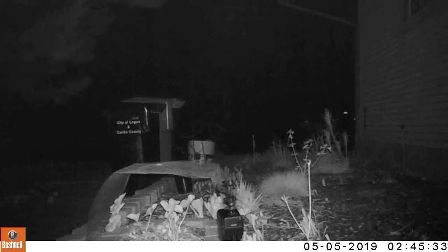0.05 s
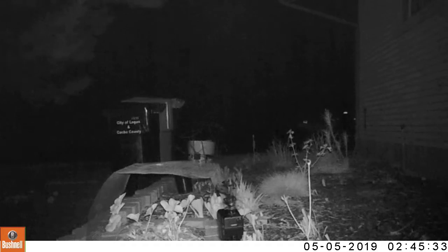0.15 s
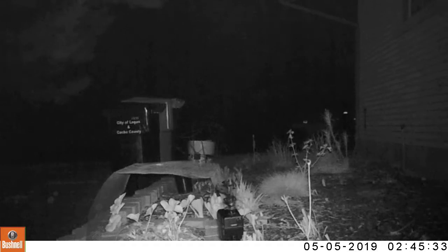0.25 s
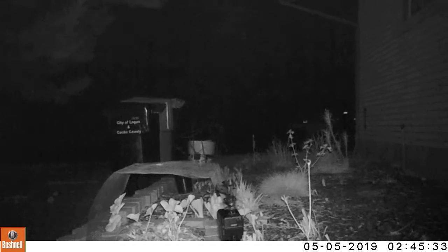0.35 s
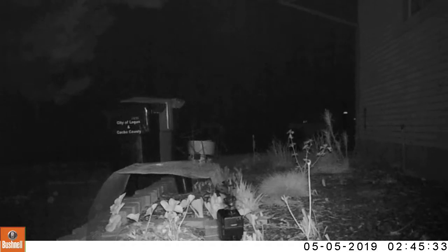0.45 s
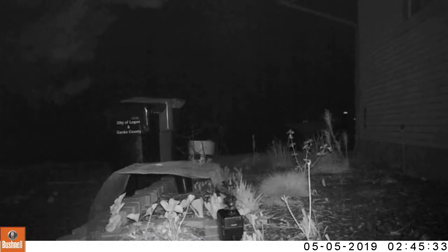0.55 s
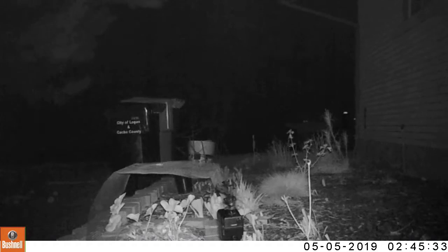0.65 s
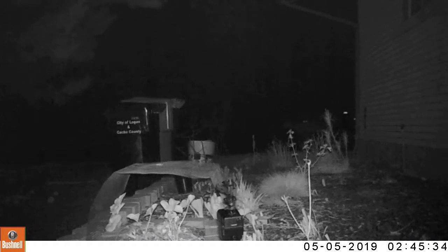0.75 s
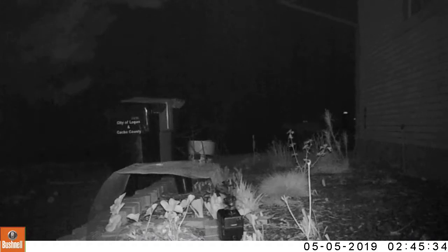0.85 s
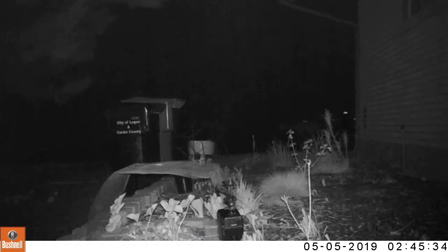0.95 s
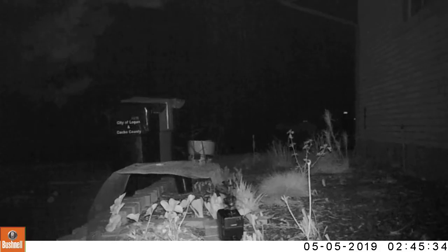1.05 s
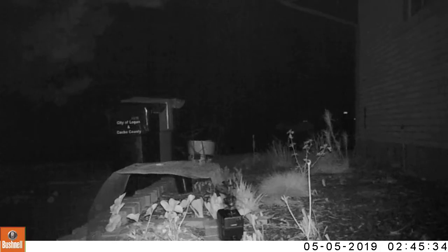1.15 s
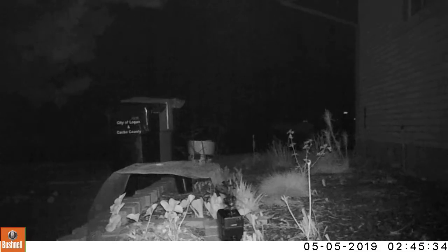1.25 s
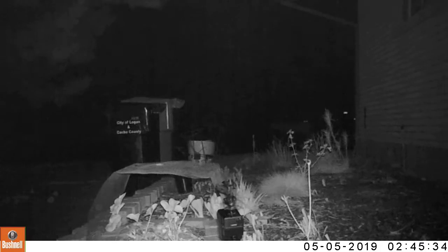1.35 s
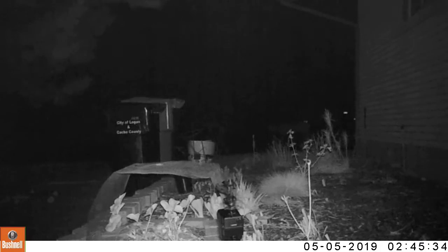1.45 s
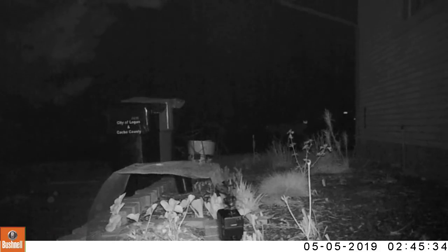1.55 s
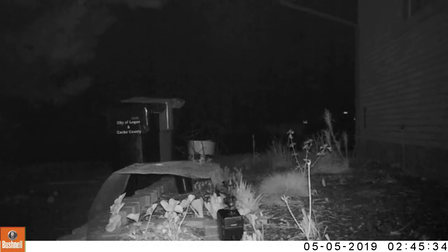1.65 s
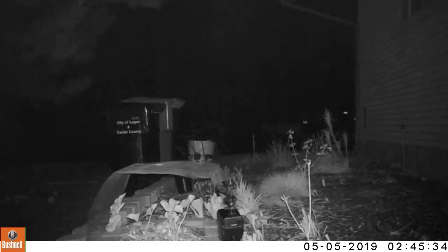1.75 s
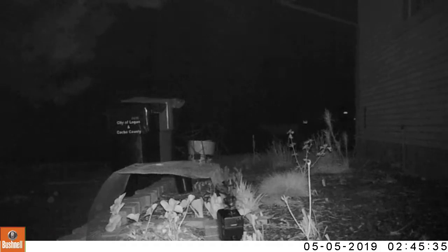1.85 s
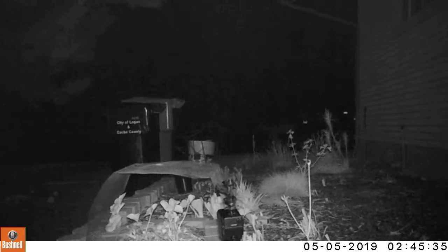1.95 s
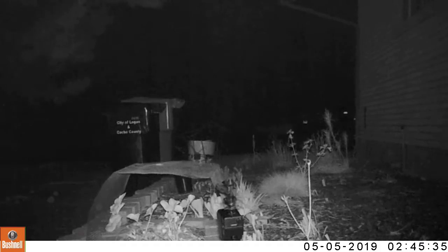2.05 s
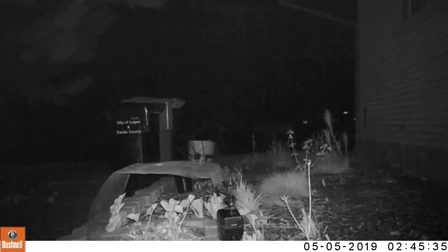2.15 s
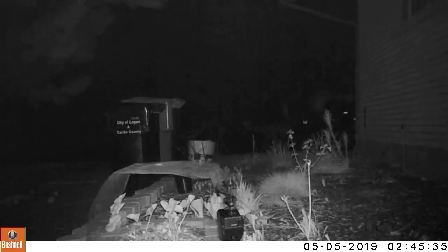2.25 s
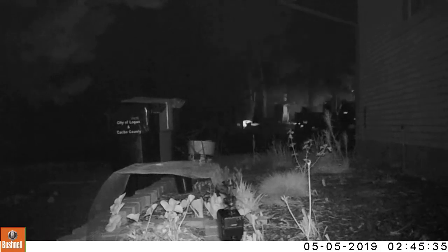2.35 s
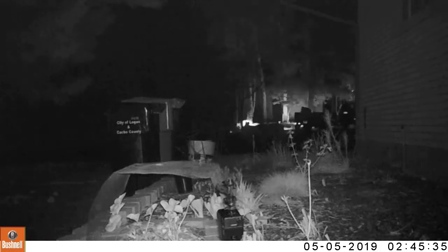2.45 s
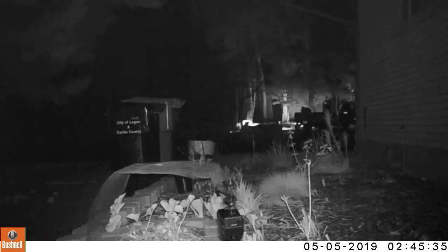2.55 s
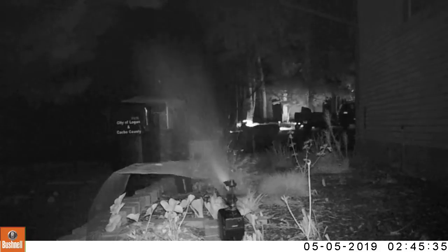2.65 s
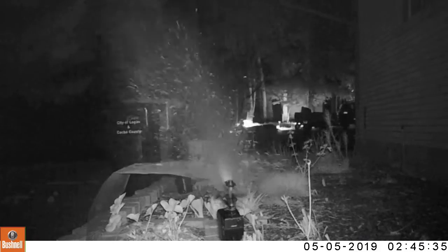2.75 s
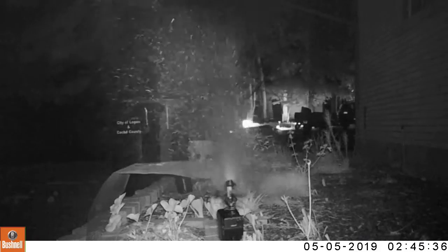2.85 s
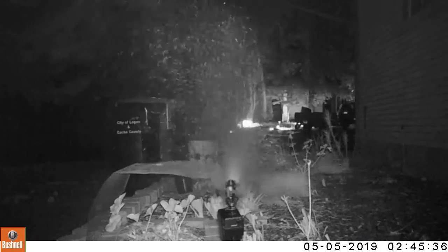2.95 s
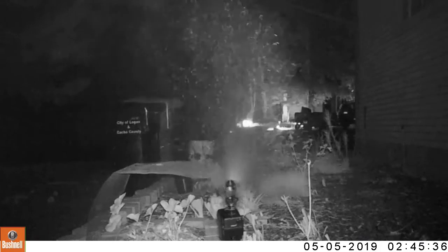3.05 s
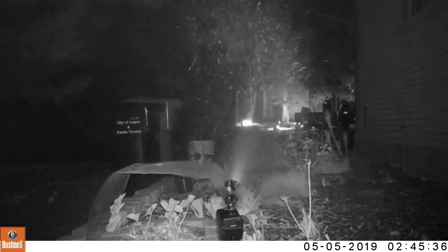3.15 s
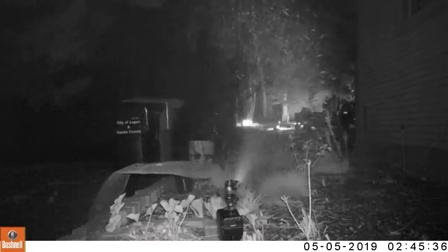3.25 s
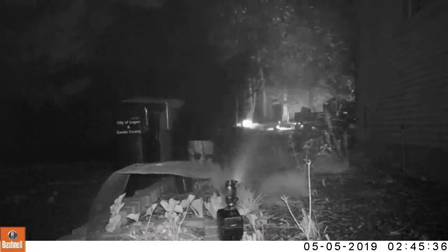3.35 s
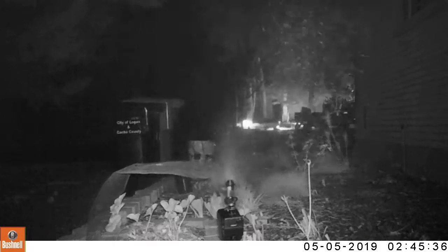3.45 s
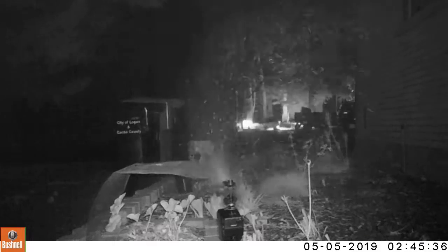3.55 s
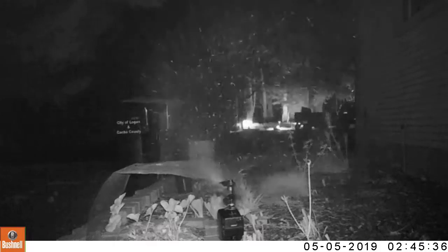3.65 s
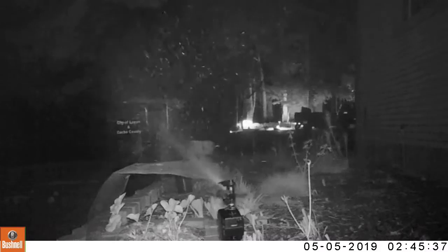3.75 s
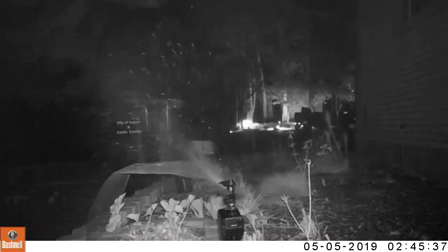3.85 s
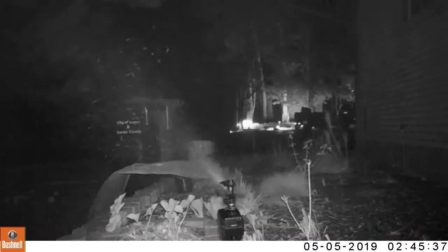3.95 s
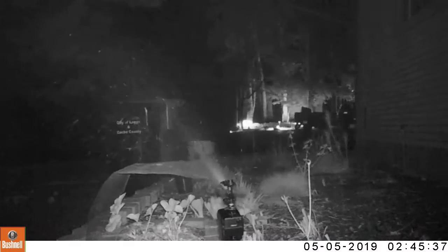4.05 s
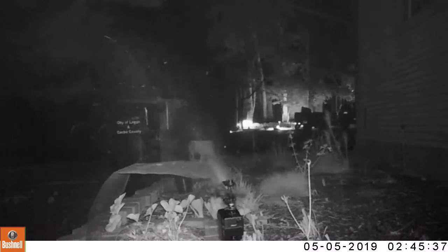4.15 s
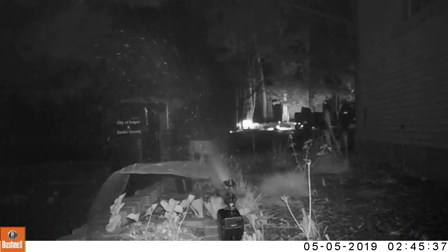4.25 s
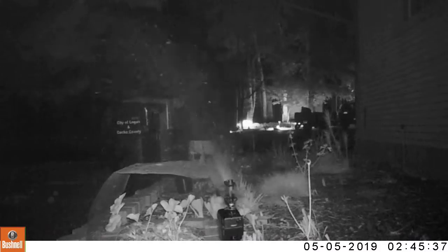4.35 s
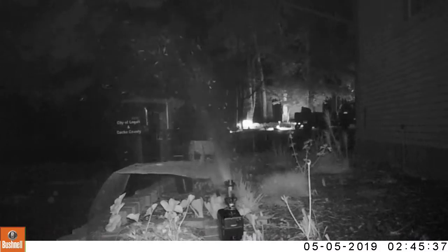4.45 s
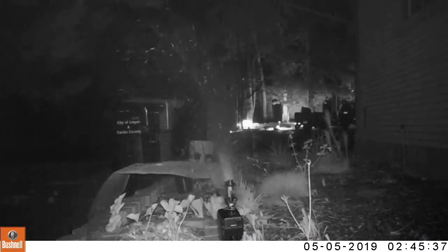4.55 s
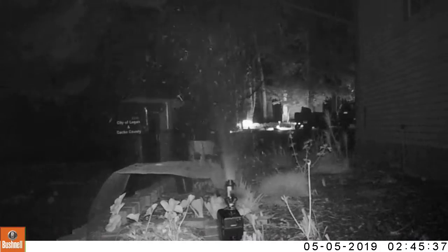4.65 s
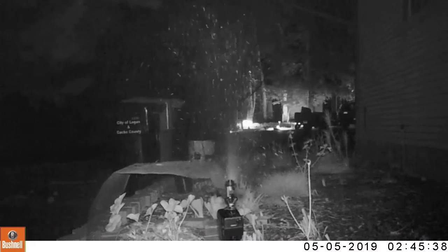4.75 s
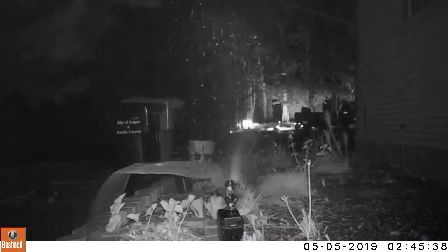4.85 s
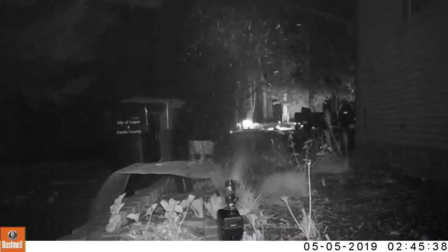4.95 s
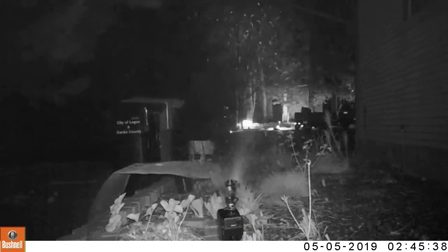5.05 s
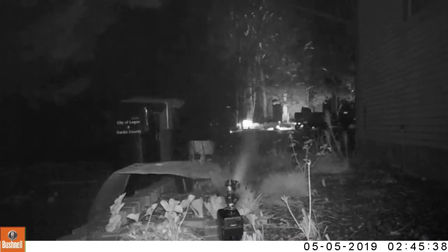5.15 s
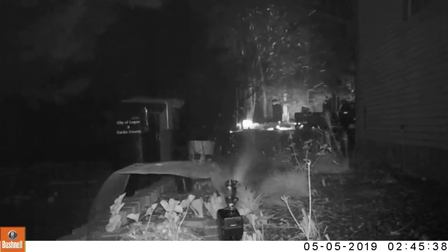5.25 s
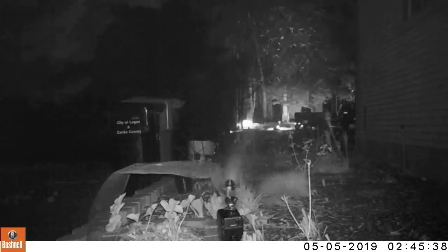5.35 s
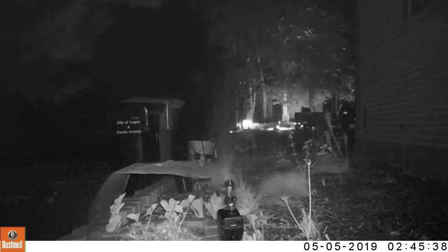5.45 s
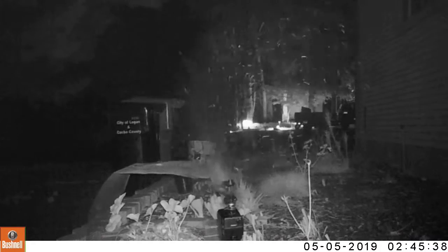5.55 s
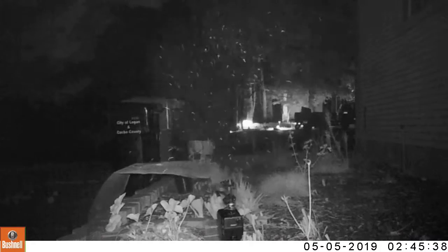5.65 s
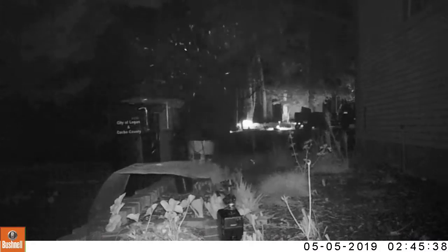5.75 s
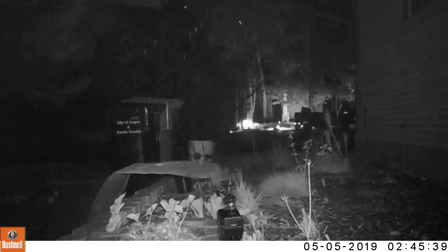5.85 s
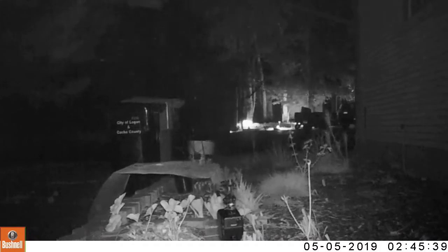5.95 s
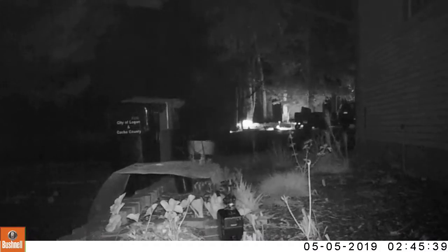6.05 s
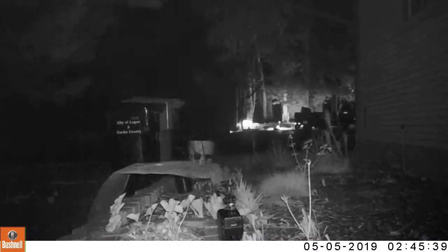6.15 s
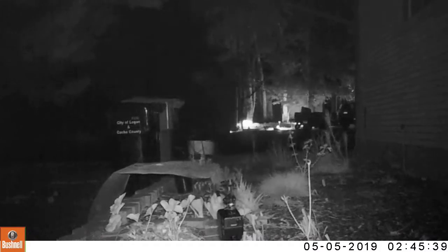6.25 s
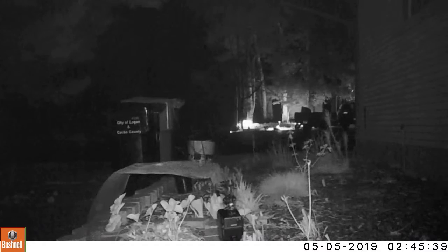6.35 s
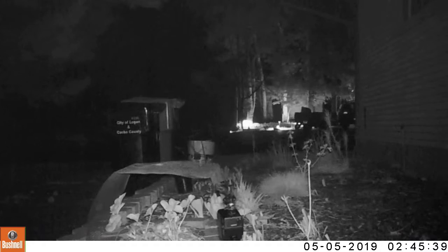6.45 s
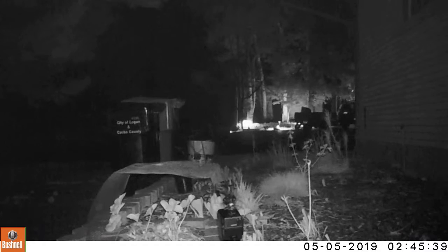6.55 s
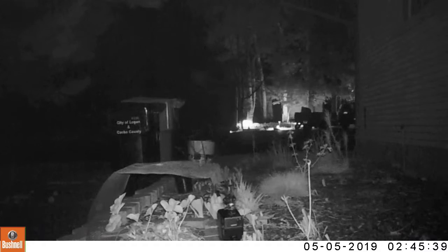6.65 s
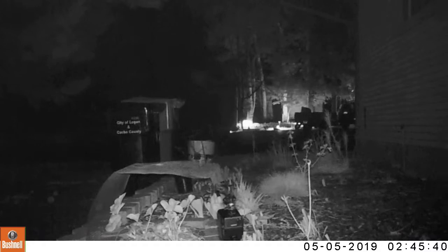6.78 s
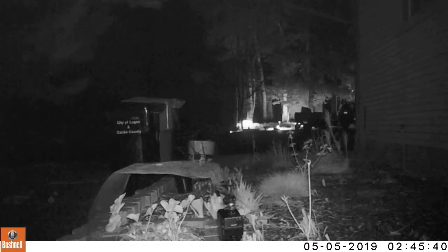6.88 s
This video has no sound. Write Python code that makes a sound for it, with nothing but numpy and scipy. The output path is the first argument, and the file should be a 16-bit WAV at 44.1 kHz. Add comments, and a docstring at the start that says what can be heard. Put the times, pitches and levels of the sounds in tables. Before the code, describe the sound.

A quiet yard at night holds only low rumble and faint hiss. A sprinkler valve snaps open and water surges out loudly, then thins to a lighter hiss. Slow, sharp slaps with metallic ticks step the head round, followed by a rapid soft flutter as it swings back; this happens twice. The water cuts off sharply with a brief fizz, leaving a few drops. The microphone is close, outdoors, with slightly dull treble.

```python
"""A sprinkler beside a house at night: over a low rumble and faint hiss, its valve snaps open with a click.
A jet of water surges out and settles to a thinner hiss, made of coloured noise, for three seconds in all.
Slow strokes of the swinging arm chop the jet and knock the head as it steps round; quick soft puffs of
spray flutter as it swings back, and both happen twice, while fine drops patter down.
The valve shuts, the nozzle fizzes as it empties, and the last drops land on the garden."""
import sys
import numpy as np
from scipy import signal
from scipy.fft import rfft, irfft
from scipy.io import wavfile

SR = 44100
rng = np.random.default_rng(int(sys.argv[2]) if len(sys.argv) > 2 else 0)


def to_wav(sig):
    """Store sig (one row per channel, or 1-D mono) as 16-bit WAV at the path in sys.argv[1].

    Samples outside -1..1 are clipped; the rate is SR.
    """
    pcm = np.clip(np.atleast_2d(sig), -1, 1) * 32767
    pcm = np.round(pcm).astype(np.int16)
    wavfile.write(sys.argv[1], SR, pcm.T)  # frames by channels


N = 305127
TIME = np.arange(N) / SR  # [s]
BINS = np.fft.rfftfreq(N, 1 / SR)  # [Hz]

# Noise colours: only the shape counts, since the loudness is set elsewhere.
# the jet in its first surge: (frequency [Hz], relative level per Hz [dB])
JET_FULL_COLOUR = [(120, -13), (250, -8), (500, -6.5), (930, -11.5), (1300, -6.5), (1900, -2.5), (2900, -1),
                   (3900, 2), (4900, 3), (5600, 6.5), (6600, -4), (7900, -6.5), (8800, -14), (13500, -24.5)]
# the jet once it has thinned: (frequency [Hz], relative level per Hz [dB])
JET_THIN_COLOUR = [(120, -31), (250, -14.5), (450, -6), (600, -12.5), (930, -14), (1300, -7.5), (1900, -4),
                   (3200, -4.5), (3900, -0.5), (4900, -1.5), (5600, 2.5), (6600, -7), (7900, -10.5),
                   (8800, -17), (13500, -26.5)]
# resonances of the head and housing stirred by the water: (frequency [Hz], width [Hz], lift over the hiss [dB])
HEAD_RESONANCES = [(215, 40, 3), (330, 30, 2), (452, 45, 5), (535, 25, 3), (725, 45, 4), (1100, 90, 2),
                   (1860, 60, 2), (3276, 22, 7), (3540, 25, 2.5), (3674, 20, 2.5), (3755, 45, 2),
                   (3915, 65, 5), (4154, 45, 3.5), (4281, 25, 2.5), (4402, 32, 5), (4537, 20, 4),
                   (4702, 60, 3), (4887, 25, 3), (5037, 25, 3), (5185, 27, 2.5), (5378, 50, 5),
                   (5534, 70, 2.5), (5750, 250, 1.5), (5958, 15, 5)]
# water fanning off the arm: (frequency [Hz], relative level per Hz [dB])
FAN_COLOUR = [(200, -13.5), (500, -3), (1000, -13.5), (2500, -11), (4000, -11), (5600, 4), (7000, -1),
              (8100, -3.5), (8900, -17), (10000, -10), (11000, -27), (13500, -17.5)]
# the arm cutting into the jet: (frequency [Hz], relative level per Hz [dB])
SLAP_COLOUR = [(150, -23), (500, -10), (950, -17), (1700, 0.5), (3000, -3), (4200, -1.5), (5700, 6),
               (6700, -2), (8100, -1), (8900, -18), (10000, -18), (11000, -25), (13500, -22)]
# the valve's click: (frequency [Hz], relative level per Hz [dB])
VALVE_COLOUR = [(100, -12), (500, 8), (1200, 1.5), (3800, -7), (7000, -5), (9000, -19), (13500, -24)]
# fine drops landing: (frequency [Hz], relative level per Hz [dB])
DROP_COLOUR = [(300, -20), (900, -3.5), (2000, 0.5), (3500, 0), (5400, 3), (6500, -4), (8000, -11.5),
               (13000, -19)]
# a big drop landing: (frequency [Hz], relative level per Hz [dB])
SPLAT_COLOUR = [(300, -15), (900, -4), (1700, 2), (3000, 3), (4200, -2), (5600, -1), (6500, -6),
                (8000, -19), (13000, -36)]
# the emptying nozzle: (frequency [Hz], relative level per Hz [dB])
FIZZ_COLOUR = [(2000, -11.5), (3500, -8), (3950, 5), (4200, 1), (4600, -13), (5800, -20), (8000, -38)]
# the night air: (frequency [Hz], relative level per Hz [dB])
NIGHT_COLOUR = [(8.8, -34), (15, 3.5), (27, -6), (43, -9), (139, -14.5), (213, -19.5), (253, -21),
                (474, -28.5), (546, -29), (630, -31.5), (686, -31), (815, -34.5), (2700, -46),
                (13700, -55.5)]

# tones of the head when knocked: (frequency [Hz], relative level [dB], time to fall 60 dB [s])
HEAD_RING = [(3810, -1.5, 0.029), (3910, -3, 0.056), (4145, 0.5, 0.058), (4420, -1.5, 0.015),
             (4560, -6, 0.038), (4700, -3.5, 0.032), (5200, -6, 0.043), (5340, -0.5, 0.023),
             (5600, -5, 0.011), (5900, -9, 0.022), (5920, 0.5, 0.02), (7170, -7, .012), (8200, -14, 0.01)]
# low, hollow tones of the housing: (frequency [Hz], typical level [dB], time to fall 60 dB [s])
HOUSING_TONES = [(452, -56, 0.13), (719, -58, 0.14)]
# knocks of the valve and head as the pressure comes and goes: (time [s], level [dB])
PRESSURE_KNOCKS = [(2.6918, -39), (5.797, -53), (5.82, -62)]
# big drops on leaves: (time [s], level [dB])
BIG_DROPS = [(5.946, -66), (5.952, -63), (6.172, -65), (6.186, -66), (6.223, -52), (6.231, -68),
             (6.413, -60.5), (6.538, -59)]
# slow runs that step the head round, with levels halfway along each run:
# (first stroke [s], last stroke [s], slap in the jet [dB], knock on the head [dB])
STEPPING = [(2.824, 3.458, -34, -34.5), (3.9827, 5.3555, -36, -36.5)]
# fast runs that swing the head back: (first stroke [s], last stroke [s], rough spacing [s], typical level [dB])
SWINGS = [(3.506, 3.861, 0.0443, -43), (5.423, 5.730, 0.051, -44.5)]

# the water pressure builds when the valve opens, holds, and collapses when it shuts
VALVE_S, RISE_S, SHUT_S, FALL_DB_PER_S = 2.6807, 0.021, 5.745, 246
VALVE_DB, NIGHT_DB = -36, -52
# the settled jet, its extra loudness in the first surge, and when and how slowly it settles
JET_DB, SURGE_DB, SETTLE_AT_S, SETTLE_S = -46.5, 11, 3.593, 0.31
# the jet's colour thins during the first swing back; the share is how far it goes (1 = fully)
THIN_AT_S, THIN_S, THIN_SHARE = 3.62, 0.061, 0.83
STROKE_S = 0.125  # rough spacing of the slow strokes
# along a run the slaps weaken and the knocks harden
SLAP_FADE_DB_PER_S, KNOCK_GROW_DB_PER_S, STROKE_VARY_DB = 2.4, 2.5, 0.9
# a hollow band in the settled hiss rises as the head steps round
HOLLOW_HZ, HOLLOW_RISE_HZ, HOLLOW_DB = 2474, 290.3, -59.5
# the spray takes a flight time to reach the ground
FLIGHT_S, PATTER_DB, PATTER_FADE_DB_PER_S = 0.82, -69.5, 52
EDGE_HZ = 13900  # the treble is cut above this


def jet(grain=0.35, sputter_db=0.45):
    """Churning water and bursting droplets at the nozzle: a full surge settles to a thinner hiss."""
    rush = noise() + grain * droplets(per_s=3000, spread_db=4.0)
    rush = rush * amp(sputter_db * wander(rate_hz=57))
    lift_db = sum(db / (1 + (2 * (BINS - hz) / width) ** 2) for hz, width, db in HEAD_RESONANCES)
    rush = irfft(rfft(rush) * amp(lift_db), N)
    thin = THIN_SHARE * ease(THIN_AT_S, THIN_S)
    blend = (1 - thin) * colour(rush, JET_FULL_COLOUR) + thin * colour(rush, JET_THIN_COLOUR)
    surge_db = SURGE_DB * (1 - ease(SETTLE_AT_S, SETTLE_S))
    return pressure() * amp(JET_DB + surge_db) * blend


def hollow(width_hz=480, waver_db=1.4):
    """A wavering band of the rushing noise, carried up and down by the turn of the head."""
    band = wander(width_hz / 2) + 1j * wander(width_hz / 2)
    band = band * amp(waver_db * wander(rate_hz=8.9))
    centre_hz = HOLLOW_HZ + HOLLOW_RISE_HZ * aim()
    carrier = np.exp(2j * np.pi * np.cumsum(centre_hz) / SR)  # lifts the slow noise up to the band
    return amp(HOLLOW_DB) * pressure() * ease(THIN_AT_S, THIN_S) * (band * carrier).real


def pressure():
    """Water pressure at the nozzle, 0 to 1: it builds, holds and collapses."""
    opening = 1 - np.exp(-np.maximum(TIME - VALVE_S, 0) / RISE_S)
    return opening * amp(-FALL_DB_PER_S * np.maximum(TIME - SHUT_S, 0))


def aim():
    """Where the head points, 0 to 1: it turns over each slow run and is back by the end of the fast one."""
    points = []
    for steps, swing in zip(STEPPING, SWINGS):
        points += [(steps[0], 0), (steps[1], 1), (swing[1], 0)]
    return curve(points)


def slow_strokes():
    """The arm swings steadily, with varying force: rows of (time [s], slap [dB], knock [dB])."""
    rows = []
    for first, last, slap_db, knock_db in STEPPING:
        for s in beats(first, last, STROKE_S):
            along_s = s - (first + last) / 2  # time from the middle of the run
            slap_luck, knock_luck = STROKE_VARY_DB * rng.standard_normal(2)
            slap = slap_db - SLAP_FADE_DB_PER_S * along_s + slap_luck
            knock = knock_db + KNOCK_GROW_DB_PER_S * along_s + knock_luck
            rows.append((s, slap, knock))
    return rows


def slaps(strokes, peak_s=0.0015, width_s=0.0017, graze_db=-11, graze_s=0.0057,
          fan_db=-10, fan_delay_s=0.0045, fan_decay_s=0.022):
    """At each slow stroke the arm grazes the jet, cuts into it and throws a short fan of spray."""
    s, db, _ = np.transpose(strokes)
    slap = puffs(s + peak_s, db, width_s) * colour(noise(), SLAP_COLOUR)
    graze = puffs(s, db + graze_db, graze_s)
    fan = bursts(s + fan_delay_s, db + fan_db, fan_decay_s)
    return slap + np.hypot(graze, fan) * colour(noise(), FAN_COLOUR)


def flutter(width_s=0.015, vary_db=0.6):
    """On the way back the arm barely leaves the jet: soft, bright puffs of spray."""
    strokes = []
    for first, last, period, db in SWINGS:
        for s in beats(first, last, period):
            strokes.append((s, db + vary_db * rng.standard_normal()))
    return puffs(*np.transpose(strokes), width_s) * colour(noise(), FAN_COLOUR)


def knocks(strokes, flight_s=0.007, bounce_s=0.0065, bounce_db=-1, scatter_s=0.0008):
    """Just after each slap the arm lands on the head and bounces once, making it ring."""
    out = np.zeros(N)
    for s, _, db in strokes:
        landing = s + flight_s + scatter_s * rng.standard_normal()
        add(out, landing, clink(db))
        add(out, landing + bounce_s, clink(db + bounce_db))
    return out


def pressure_knocks():
    """The valve and head knock and ring as the pressure comes and goes."""
    out = np.zeros(N)
    for s, db in PRESSURE_KNOCKS:
        add(out, s, clink(db))
    return out


def clink(db, vary_db=3.5, contact_s=0.00037):
    """One blow on the head: its tones ring and fade, in a slightly different mix each time."""
    t = TIME[:SR // 6]
    hz, level, t60 = np.transpose(HEAD_RING)[:, :, None]
    height = amp(level + vary_db * rng.standard_normal(hz.shape))
    start = rng.random(hz.shape)  # where in its cycle each tone begins
    modes = height * amp(-60 * t / t60) * np.sin(2 * np.pi * (hz * t + start))
    cushion = 1 - np.exp(-t / contact_s)  # each blow starts softly, over a fraction of a millisecond
    return amp(db) * cushion * modes.sum(0) / np.sqrt(np.sum(height ** 2) / 2)


def housing(strokes, vary_db=1.5):
    """Each slow stroke also sets the housing murmuring in low, fading tones."""
    out, t = np.zeros(N), TIME[:SR // 3]
    for s, _, _ in strokes:
        for hz, db, t60 in HOUSING_TONES:
            level_db = db + vary_db * rng.standard_normal() - 60 * t / t60
            add(out, s, amp(level_db) * np.sin(2 * np.pi * hz * t))
    return out


def valve(decay_s=0.0025):
    """The valve snaps open with a dry click: a very short burst of noise."""
    return bursts([VALVE_S], [VALVE_DB], decay_s) * colour(noise(), VALVE_COLOUR)


def drain(at_s=5.795, level_db=-53, width_s=0.029):
    """The last water fizzes out of the nozzle as the pressure falls."""
    return puffs([at_s], [level_db], width_s) * colour(noise(), FIZZ_COLOUR)


def patter(splat_s=0.0049):
    """The spray comes down on leaves and soil, and goes on falling after the jet stops."""
    build = np.clip((TIME - VALVE_S) / FLIGHT_S, 0, 1)
    fade = amp(-PATTER_FADE_DB_PER_S * np.maximum(TIME - SHUT_S - FLIGHT_S, 0))
    fine = amp(PATTER_DB) * build * fade * colour(droplets(per_s=980, spread_db=1.0), DROP_COLOUR)
    big = bursts(*np.transpose(BIG_DROPS), splat_s) * colour(noise(), SPLAT_COLOUR)
    return fine + big


def yard(x, wall_s=0.008, wall_db=-22, scatter_db=-14, t60=0.13):
    """A faint echo off the house wall and a short scatter from the things around."""
    t = TIME[:SR // 2]
    tail = rng.standard_normal(len(t)) * amp(-60 * t / t60) * (t > wall_s)
    tail = tail / np.linalg.norm(tail)
    echo = np.interp(TIME - wall_s, TIME, x)
    return x + amp(wall_db) * echo + amp(scatter_db) * signal.oaconvolve(x, tail)[:N]


def night():
    """A steady low rumble that thins into faint hiss towards the treble."""
    return amp(NIGHT_DB) * colour(noise(), NIGHT_COLOUR)


def amp(db):
    """Turns decibels into a gain."""
    return 10 ** (np.asarray(db) / 20)


def unit(x):
    """Scales a sound to an average (rms) strength of 1."""
    return x / np.sqrt(np.mean(x ** 2) + 1e-20)


def noise():
    """White noise."""
    return rng.standard_normal(N)


def colour(x, points):
    """Filters x by a (frequency [Hz], level [dB]) curve and scales it to rms 1."""
    hz, db = np.transpose(points)
    gain = amp(np.interp(np.log(BINS + 1), np.log(hz), db))
    return unit(irfft(rfft(x) * gain, N))


def wander(rate_hz):
    """Random drift, with little movement faster than the rate, at rms 1."""
    return unit(irfft(rfft(noise()) / (1 + (BINS / rate_hz) ** 4), N))


def droplets(per_s, spread_db):
    """Random clicks of uneven size, at rms 1; a wider spread makes a few much larger than the rest."""
    sizes = amp(spread_db * np.minimum(rng.exponential(1, N), 4)) * np.sign(noise())
    return unit(sizes * (rng.random(N) < per_s / SR))


def bursts(times, dbs, decay_s):
    """A loudness curve that jumps at each time and dies away."""
    kicks = np.zeros(N)
    kicks[np.round(np.asarray(times) * SR).astype(int)] = amp(dbs)
    return signal.lfilter([1], [1, -np.exp(-1 / (decay_s * SR))], kicks)


def puffs(times, dbs, width_s):
    """A loudness curve that swells and fades round each time."""
    return sum(amp(db) * np.exp(-((TIME - s) / width_s) ** 2) for s, db in zip(times, dbs))


def beats(first_s, last_s, period_s):
    """Evenly spaced stroke times, as near to the period as fits the run."""
    return np.linspace(first_s, last_s, round((last_s - first_s) / period_s) + 1)


def ease(at_s, over_s):
    """A smooth step from 0 to 1 round a time."""
    return 0.5 + 0.5 * np.tanh((TIME - at_s) / (2 * over_s))


def curve(rows):
    """Joins (time [s], value) rows by straight lines."""
    return np.interp(TIME, *np.transpose(rows))


def add(mix, s, sound):
    """Mixes a sound in at time s."""
    part = mix[round(s * SR):][:len(sound)]
    part += sound[:len(part)]


def scene():
    """The sprinkler and its falling water in the quiet yard."""
    strokes = slow_strokes()
    water = jet() + hollow() + slaps(strokes) + flutter() + drain() + patter()
    water = water * (TIME > VALVE_S)  # no water before the valve opens
    hard_parts = knocks(strokes) + pressure_knocks() + housing(strokes) + valve()
    return (yard(water + hard_parts) + night())[None]


def record(dry):
    """Cuts the treble above the edge with a steep low-pass filter."""
    lowpass = signal.firwin(511, EDGE_HZ, window=("kaiser", 8), fs=SR)
    return signal.oaconvolve(dry, lowpass[None], "same")


dry = scene()
out = record(dry)
to_wav(out)
```